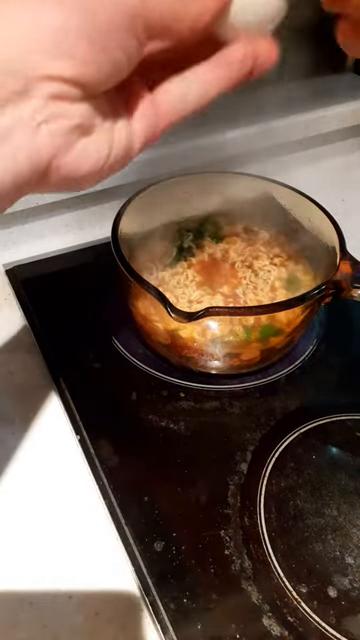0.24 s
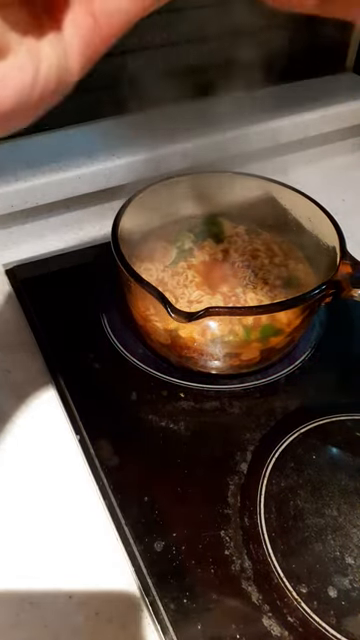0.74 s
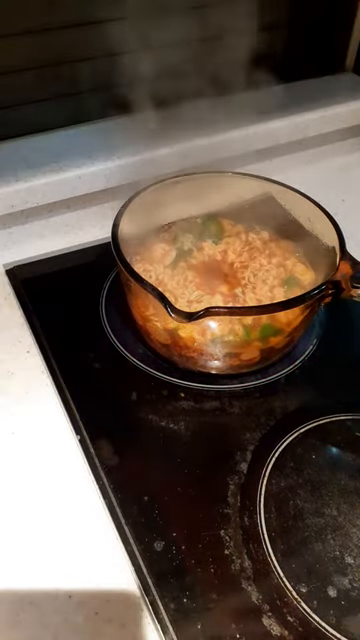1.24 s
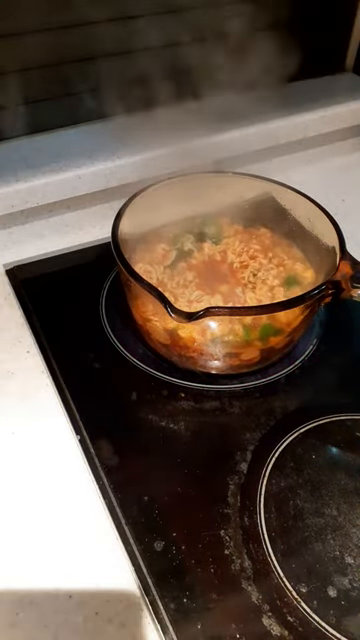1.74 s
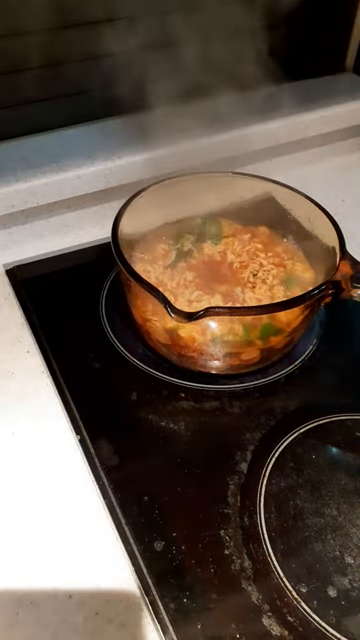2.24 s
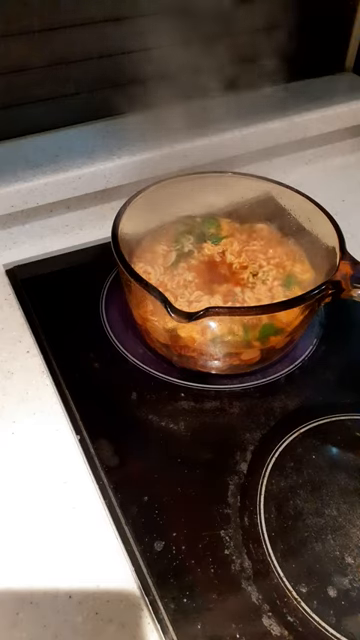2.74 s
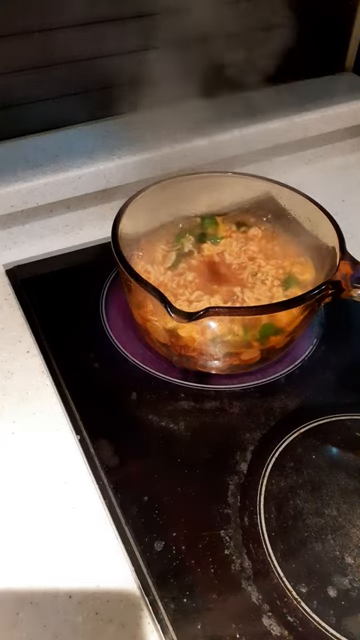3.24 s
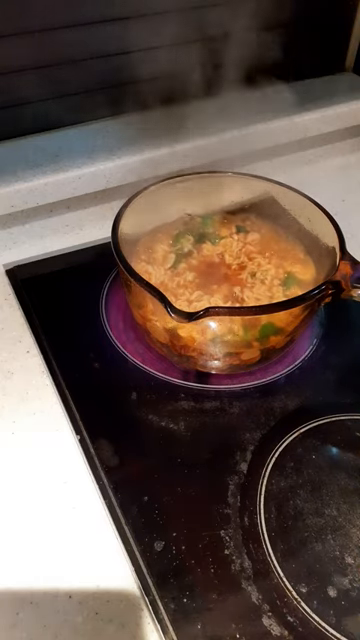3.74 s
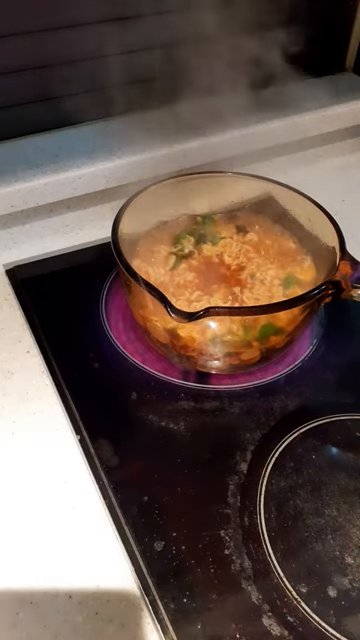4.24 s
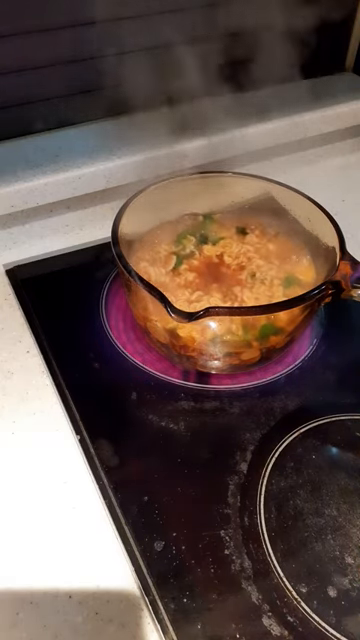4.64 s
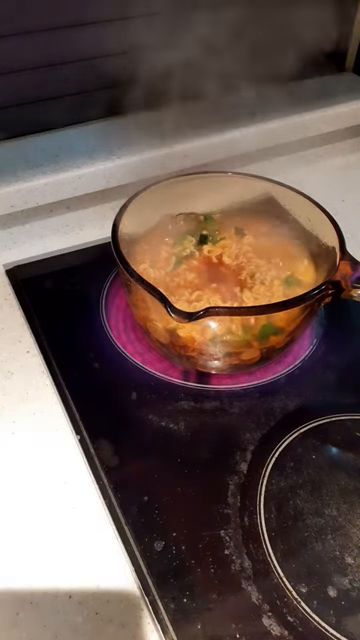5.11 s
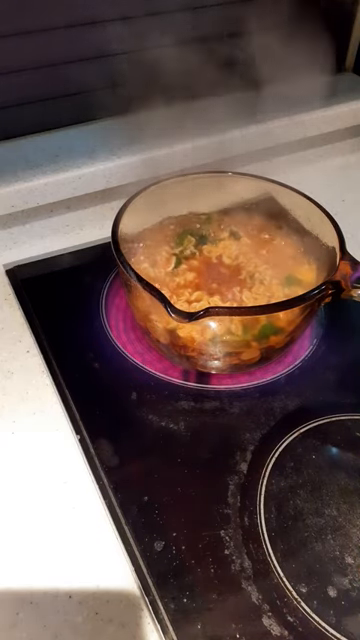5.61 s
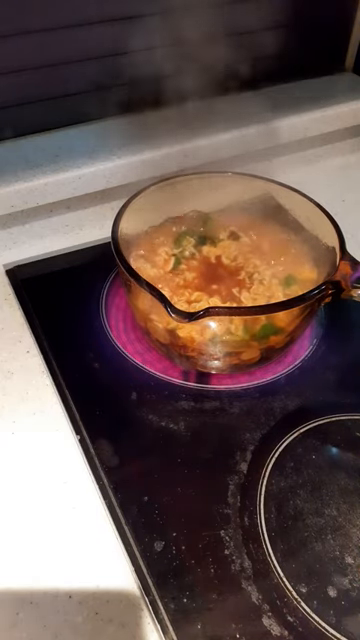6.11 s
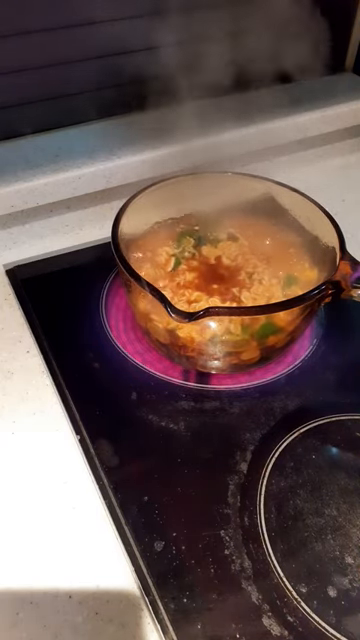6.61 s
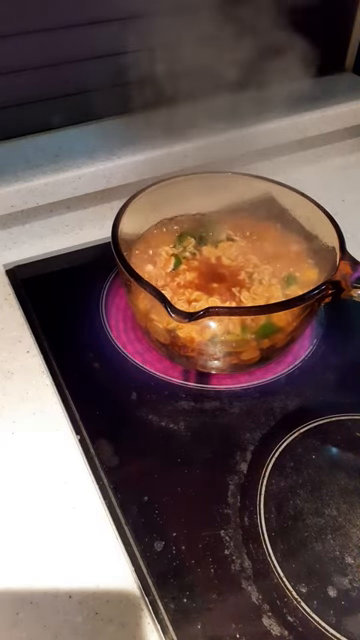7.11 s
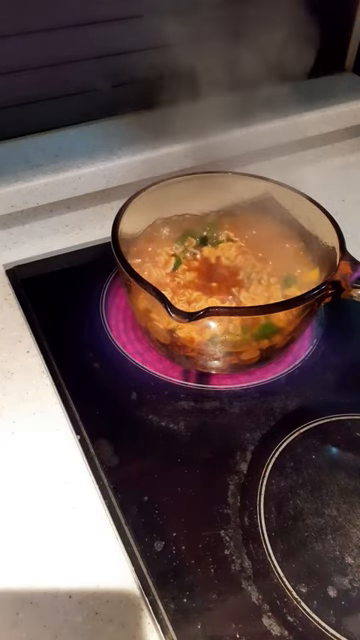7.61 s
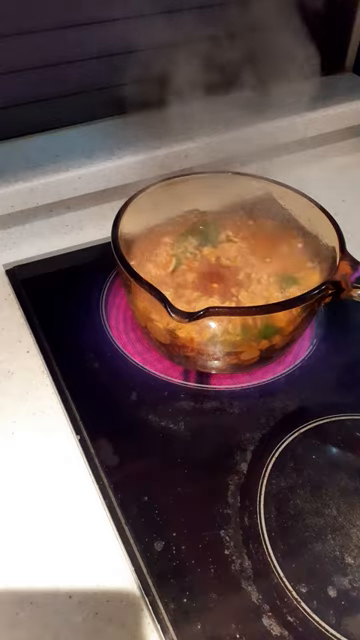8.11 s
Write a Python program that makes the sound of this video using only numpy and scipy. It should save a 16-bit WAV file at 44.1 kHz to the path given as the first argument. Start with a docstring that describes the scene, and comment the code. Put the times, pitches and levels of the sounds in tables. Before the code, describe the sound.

In a small home kitchen, hands work a thin plastic wrapper near a gently bubbling glass saucepan. Dry snaps and ticks come first, thinning out, then a loud hissing crumple with scrapes and knocks on the worktop fills the middle. Afterwards only scattered crackles remain over soft fizz and low hum. Close stereo microphones, open and bright on the left, thinner and hollow, cup-like on the right.

```python
"""Hands tear, crumple and shake a plastic seasoning wrapper: noise bursts, sharp pulses and crackle.
Beside it a glass saucepan simmers: soft low fizz, which also holds the low part of the crumpling,
and rising bubble chirps. Short tones near 800 Hz are held inside grainy bursts of noise.
The worktop rumbles and rings when knocked, and the kitchen hums as two wavering tones.
Two microphone ports listen: the left in the open, the right through the air column of a cup."""
import sys
import numpy as np
from scipy import signal
from scipy.fft import rfft, irfft, next_fast_len
from scipy.io import wavfile
from scipy.ndimage import uniform_filter1d

SR = 44100
rng = np.random.default_rng(int(sys.argv[2]) if len(sys.argv) > 2 else 0)


def output_pcm(signal):
    """Save a mono or channel-first signal as 16-bit PCM at the path in sys.argv[1].

    Samples are clipped to [-1, 1] before scaling.
    """
    pcm = np.clip(np.atleast_2d(signal).T, -1, 1) * 32767
    wavfile.write(sys.argv[1], SR, np.round(pcm).astype(np.int16))


N = 368676  # samples in the scene


def gain_of(db):
    """Turns decibels into a loudness factor."""
    return 10 ** (np.asarray(db) / 20)


def evened(x):
    """Scales a sound to an average (rms) size of 1."""
    return x / np.sqrt(np.mean(x ** 2) + 1e-20)


def read(points, hz):
    """Reads a table between its points, with pitch on a log scale."""
    f, value = np.transpose(points)
    return np.interp(np.log(hz + 1), np.log(f + 1), value)


def curve(rows, column=1):
    """Draws straight lines between the rows of a table, one value per sample."""
    rows = np.array(rows)
    return np.interp(np.arange(N) / SR, rows[:, 0], rows[:, column])


def coloured(x, points):
    """Makes each pitch louder or softer, as a table of levels says."""
    size = next_fast_len(x.shape[-1])
    level_db = read(points, np.fft.rfftfreq(size, 1 / SR))
    return irfft(rfft(x, size) * gain_of(level_db), size)[..., :x.shape[-1]]


def add(mix, s, sound):
    """Mixes a sound in, starting at s seconds."""
    part = mix[round(s * SR):][:len(sound)]
    part += sound[:len(part)]


def ring(x, hz, width):
    """Rings at one pitch like a small resonator; its peak gain is about 1."""
    r = np.exp(-np.pi * width / SR)
    feed = (1 - r * r) / 2
    return signal.lfilter([feed, 0, -feed], [1, -2 * r * np.cos(2 * np.pi * hz / SR), r * r], x)


def grains(per_s, spread_db):
    """Scatters clicks of random sign; a few are large."""
    size = gain_of(spread_db * np.minimum(rng.exponential(1, N), 5))
    return size * rng.choice([-1., 1.], N) * (rng.random(N) < per_s / SR)


def patchy(x, depth_db):
    """Lets patches of time and pitch swell and fade at random."""
    z = signal.stft(x, nperseg=256)[2]
    field = uniform_filter1d(rng.standard_normal(z.shape), size=14, axis=0)
    field = uniform_filter1d(field, size=6, axis=-1)
    patched = z * gain_of(depth_db * evened(field))
    return evened(signal.istft(patched, nperseg=256)[1][:N])


# Handling of the wrapper: (t/s, rustle level/dB, change of the part below about 2.5 kHz level/dB)
HANDLING = [(0, -56, 12), (.5, -58.5, -2), (1.3, -54.5, 6.5), (1.7, -54, 7.5), (2.05, -60, -5),
            (2.9, -61.5, -2), (3.71, -58, 4), (3.77, -37, 7), (3.95, -34.5, -8), (4.18, -33, -0.5),
            (4.275, -31.5, -4), (4.33, -28.5, 1), (4.47, -33.5, -5), (4.72, -30, 1), (4.79, -35, -3.5),
            (5.05, -30, -4.5), (5.61, -30, 6.5), (5.76, -48.5, 7.5), (6.05, -46, 5.5), (6.22, -54.5, 11),
            (6.6, -58.5, 10.5), (7.14, -51.5, 4.5), (7.84, -59.5, -18), (8.03, -59.5, -25),
            (8.36, -63, -14)]
# Quick flaps of the loose film: (t/s at the peak, level/dB)
FLAPS = [(1.65, -50.5), (3.862, -30), (4.054, -29.5), (4.11, -48), (4.201, -28.5), (4.429, -33.5),
         (5.15, -23), (5.73, -39), (5.84, -55), (6.039, -44), (6.126, -44.5)]
FLAP_RISE_S, FLAP_FADE_DB_PER_S = 0.025, 328


def handling_db():
    """Adds the power of the flaps, each a quick rise and a steady fade, to the slow rustle level."""
    t, power = np.arange(N) / SR, gain_of(2 * curve(HANDLING))
    for s, db in FLAPS:
        rise = np.clip(1 + (t - s) / FLAP_RISE_S, 0, 1)
        fade_db = FLAP_FADE_DB_PER_S * np.maximum(t - s, 0)
        power = power + (rise * gain_of(db - fade_db)) ** 2
    return 10 * np.log10(power)


# Tone of the film, before levelling: (f/Hz, level/dB per Hz)
FILM = [(150, -62), (400, -5), (900, -2.5), (1500, -1), (3000, -1), (7500, -1), (11000, -2), (16000, -2)]


def rustle():
    """Film hisses, crackles and rings; a separate curve raises or lowers the part below about 2.5 kHz."""
    burst = signal.oaconvolve(abs(grains(300., 1.4)), np.exp(-np.arange(400) / 95.0))[:N]
    hiss = rng.standard_normal(N) * (1 + 0.55 * evened(abs(burst)))
    level_db = handling_db()
    film = gain_of(level_db) * patchy(coloured(hiss, FILM), 3.2)
    film += gain_of(level_db - 6.0) * evened(coloured(grains(1500., 3.), FILM))  # fine crackle
    t, blips = np.arange(1500) / SR, np.zeros(N)
    for hz in np.geomspace(1000, 6000, num=16):  # small pockets of film ring briefly
        blip = np.sin(2 * np.pi * hz * t) * t * np.exp(-t / 0.0012)
        blips += signal.oaconvolve(grains(40., 2.5), blip)[:N]
    film += gain_of(level_db - 8.) * evened(blips)
    dull = signal.sosfilt(signal.butter(2, 2500, fs=SR, output="sos"), film)
    return film + (gain_of(curve(HANDLING, column=2)) - 1) * dull


# Soft low fizz: the simmer, plus the low part of the crumpling wrapper.
# Before a small lift: (t/s, level/dB)
LOW_FIZZ = [(0, -61.5), (.9, -62.5), (1.58, -55.5), (2.15, -57.5), (2.35, -55.5), (2.55, -58), (3.03, -59),
            (3.7, -58), (4.14, -50), (5.1, -50), (5.75, -52.5), (6.12, -59.5), (7.01, -51), (7.6, -55),
            (8.36, -53)]
# Tone of the fizz, before levelling: (f/Hz, level/dB per Hz)
FIZZ_TONE = [(90, -49), (200, 9.5), (400, 7.5), (800, 2), (1500, 2), (3000, 1.5), (7000, -9.5),
             (16000, -46)]
# Air ringing in the pan: (f/Hz, width f/Hz, level/dB against the fizz)
PAN = [(495, 82, -56), (708, 29, -7.5), (792.5, 30, -11), (1180, 92, -6.5)]


def simmer():
    """Bubbles burst with a rising pitch over low fizz, which rings like the air in the pan."""
    t, bubbles = np.arange(1500) / SR, np.zeros(N)
    for hz in np.geomspace(500, 1800, num=12):
        rising_tone = np.sin(2 * np.pi * hz * (t + 8 * t ** 2))
        bubble = rising_tone * np.exp(-t * hz / 5) * np.minimum(t / 0.001, 1)
        bubbles += signal.oaconvolve(grains(6.0, 4.7), bubble)[:N]
    fizz = patchy(coloured(rng.standard_normal(N), FIZZ_TONE), 1.8)
    pan_air = sum(gain_of(db) * evened(ring(fizz, hz, width)) for hz, width, db in PAN)
    return gain_of(curve(LOW_FIZZ) + 0.5) * (fizz + pan_air + 0.5 * evened(bubbles))


# Rumble through the worktop: (t/s, level/dB)
RUMBLE = [(0, -60.5), (1.8, -58), (2.75, -65), (3.54, -61), (3.7, -49), (4.3, -55.5), (5.4, -54.5),
          (5.66, -48), (5.82, -53), (6.15, -57), (8.36, -56)]
# Tone of the rumble, before levelling: (f/Hz, level/dB per Hz)
WORKTOP = [(20, -43), (35, -40), (55, -4.5), (85, -14), (120, -8.5), (180, -13.5), (260, -8.5), (400, -49),
           (800, -78)]
# Steady part of the kitchen hum: (f/Hz, rms level/dB)
HUM = [(58, -58.5), (120, -68)]


def worktop():
    """Low noise rumbles under tones that waver slightly; both ports get the same sound."""
    t = np.arange(N) / SR
    out = gain_of(curve(RUMBLE)) * evened(coloured(rng.standard_normal(N), WORKTOP))
    for hz, db in HUM:
        steady = np.sqrt(2) * np.sin(2 * np.pi * hz * t)
        waver = evened(ring(rng.standard_normal(N), hz, 0.3))
        out += gain_of(db) * (steady + 0.1 * waver)
    return out


# Snaps of the wrapper, and a few dull low plops (high body), before trim and tilt:
# (t/s, level/dB, body around 1-3 kHz level/dB)
SNAPS = [(.038, -34.5, -3), (0.1226, -28.5, -19), (0.207, -27, -10.5), (0.275, -26, -14),
         (0.3325, -12.5, -14.5), (0.362, -27, -10), (.3845, -21.5, -15), (0.504, -24, -15),
         (0.521, -22.5, -12), (0.546, -20.5, -29), (0.5696, -20, -12), (0.583, -18.5, -47),
         (.636, -23.5, -32), (0.689, -23.5, -9), (0.74, -31, -10), (0.754, -20.5, -13),
         (0.785, -24.5, -11.5), (0.803, -24, -18), (.856, -28, -12), (0.8932, -28.5, -5), (0.94, -19, -16),
         (0.994, -26, -7), (1.0425, -25, -10.5), (1.096, -27, -16), (1.123, -30, -34), (1.186, -13, -16),
         (1.284, -22.5, -11.5), (1.3385, -32, -23), (1.4198, -22.5, -6.5), (1.493, -18, -12),
         (1.6412, -16.5, -18.5), (1.7742, -21, -16), (1.7873, -12.5, -12.5), (1.8571, -28.5, -10),
         (1.875, -25.5, -33), (1.9334, -31.5, -6.5), (1.978, -24, -11.5), (1.997, -25, -10),
         (2.031, -19.5, -12.5), (2.049, -25, -9), (2.152, -30.5, -4), (2.217, -35, 0), (2.254, -33, 2),
         (2.329, -41, 14), (2.427, -16.5, -14), (2.459, -30, -6), (2.59, -51, 19.5), (2.664, -41.5, 7),
         (2.722, -32.5, 0.5), (2.824, -20, -12), (2.937, -41, -18), (3.0663, -18, -15), (3.14, -29, -13),
         (3.1565, -19.5, -10.5), (3.176, -20.5, -27), (3.2988, -16, -15), (3.3533, -30, -2),
         (3.493, -36, 2.5), (3.524, -32.5, -8), (3.6077, -16.5, -15.5), (3.736, -38, 9),
         (3.763, -15.5, -25), (4.196, -19.5, -6), (4.3858, -14, -29), (4.639, -14.5, -34),
         (4.715, -14.5, -16.5), (4.916, -15, -40), (5.158, -22, 3), (5.415, -16, -17), (5.813, -39, -18),
         (5.831, -16.5, -14), (6.0295, -14.5, -29), (6.052, -18.5, -32), (6.092, -34.5, 2),
         (6.115, -18, -20), (6.127, -13.5, -20), (6.146, -20, -28), (6.234, -21.5, -28), (6.3967, -28, 0),
         (6.609, -25.5, -9), (6.772, -32, -8), (6.805, -37, 13.5), (6.827, -25.5, -3), (6.889, -27.5, -15),
         (6.9198, -29, -10), (6.946, -31, -30), (6.984, -30, -26), (7.02, -26, -3), (7.0421, -10, -18.5),
         (7.094, -23, -17), (7.292, -16.5, -16.5), (7.317, -20.5, -12), (7.348, -23, -9),
         (7.458, -45, 19.5), (7.529, -27, -40), (7.5934, -28, -14), (7.612, -40.5, 15), (7.639, -24.5, -20),
         (7.694, -28.5, -4), (7.715, -25, -23), (7.7432, -25, -9.5), (7.761, -24, -7), (7.812, -27, -29),
         (7.8392, -23, -16), (7.914, -33.5, 6.5), (8.18, -46, 17)]
SNAP_T60_S = 0.027  # time to fade by 60 dB


def snaps():
    """Noise swells as a crease gives way, then rattles unevenly and fades; a high body makes a dull plop."""
    out, t = np.zeros(N), np.arange(4096) / SR
    lead = 64  # samples of room for the filter to spread ahead of the snap
    for (s, db, body_db), noise in zip(SNAPS, rng.standard_normal((len(SNAPS), 2, 4096))):
        rise = .0028 * gain_of(.8 * (db + 12))  # a louder one takes longer to swell
        swell = np.minimum(0.29 + t / rise, 1)
        shake = swell * gain_of(-60 * np.maximum(t - rise, 0) / SNAP_T60_S)
        lumps = gain_of(4. * evened(uniform_filter1d(noise[1], size=16)))
        rattle = np.roll(noise[0] * shake * lumps, lead)
        tilt = [(120, body_db + 8.5), (500, body_db + 10.5), (1500, body_db + 13.5),
                (4500, 0.006), (16000, 0.01)]
        add(out, s - lead / SR, gain_of(db - 9.0) * coloured(rattle, tilt))
    return out


# Sharp spikes of the film, many of them at the onset of a snap.
# Before the final tone and lift: (t/s, level/dB)
SPIKES = [(0.0393, -29), (0.1234, -21), (0.2098, -21), (0.2798, -18), (0.3337, -8), (0.3454, -16),
          (0.3844, -22), (0.4106, -20), (0.5714, -18), (0.6811, -24), (0.6895, -17), (0.7429, -22),
          (0.7864, -20), (0.8046, -21), (1.0428, -21), (1.1242, -19), (1.1717, -30), (1.2843, -20),
          (1.4212, -18), (1.4813, -30), (1.508, -17), (1.5843, -32), (1.5896, -27), (1.616, -29),
          (1.6272, -24), (1.6428, -12), (1.6879, -24), (1.7892, -11), (1.8591, -22), (2.0518, -18),
          (2.0951, -27), (2.1387, -32), (2.1547, -27), (2.2428, -32), (2.2768, -29), (2.7555, -29),
          (3.0689, -17), (3.1412, -22), (3.1584, -11), (3.4971, -23), (3.5255, -25), (3.5869, -33),
          (3.7398, -22), (5.8328, -11), (6.0173, -17), (6.234, -15), (6.2439, -18), (6.3757, -29),
          (6.3971, -19), (6.6117, -15), (6.6512, -29), (6.7723, -19), (6.8683, -28), (6.9214, -21),
          (6.9479, -18), (6.9846, -19), (7.0949, -17), (7.1204, -26), (7.1372, -25), (7.1588, -26),
          (7.1838, -28), (7.1947, -29), (7.2947, -14), (7.3161, -17), (7.3388, -18), (7.3854, -27),
          (7.4396, -27), (7.4867, -22), (7.5294, -25), (7.5648, -25), (7.5944, -20), (7.6409, -21),
          (7.6756, -26), (7.6952, -20), (7.7163, -17), (7.7439, -21), (7.7636, -20), (7.8129, -20),
          (7.841, -15), (7.9036, -31)]
# Echo off the worktop: (delay/samples, share of the spike)
BOUNCE = (68, .45)


def cracks():
    """Each listed crack is one inward pulse that flutters and bounces; dense crackle goes either way."""
    train, t = np.zeros(N), np.arange(200) / SR
    for s, db in SPIKES:
        add(train, s, gain_of([db]))
    level_db = handling_db()
    # lesser inward cracks at random
    train += gain_of(np.minimum(level_db, -50.) + 18.) * abs(grains(60., 3.))
    train += gain_of(level_db + 7.) * grains(700., 3.)  # dense crackle under the grip
    delay, share = BOUNCE
    train += share * np.roll(train, delay)
    pulse = -np.cos(2 * np.pi * 6500 * t) * np.exp(-t / .0001)
    cracking = signal.oaconvolve(train, pulse)[:N]
    return gain_of(2.5) * coloured(cracking, [(300, -20), (1500, -6.), (4000, 0)])


# Short scrapes of film on film, before trim; lengths under 5 ms are raised to it:
# (t/s, level/dB, centre f/Hz, length t/s, lower pocket against the centre level/dB)
SCRAPES = [(0.36, -17, 2870, 0.01, 5), (0.384, -28.5, 2830, 0.098, 6), (0.421, -45, 2950, 0.1, 13),
           (0.522, -38, 2760, 0.067, 11), (0.579, -16, 2720, 0.036, -1), (0.581, -15.5, 4460, 0.022, -11),
           (0.604, -30.5, 2600, 0.033, 6), (3.929, -9, 1320, 0.0045, -3.5), (4.19, -16.5, 3800, 0.019, -17),
           (4.309, -25, 920, 0.074, -22), (4.108, -11.5, 4430, 0.014, -15),
           (4.502, -15.5, 2360, 0.028, -21), (4.592, -19.5, 3070, 0.027, -16),
           (4.611, -16, 3330, 0.029, -21), (4.707, -8.5, 1910, 0.016, -21), (4.72, -17, 2800, .012, -20),
           (4.813, -17.5, 3800, 0.039, -19), (4.915, -16, 4500, .015, -20), (5.003, -17.5, 3170, 0.031, -3),
           (5.025, -16, 2630, 0.031, 2), (5.039, -7, 1245, 0.03, -30), (5.203, -15, 1230, 0.056, -11),
           (5.137, -14, 820, 0.026, -10), (5.304, -15.5, 1390, 0.055, -32),
           (5.505, -17.5, 835, 0.061, -4.5), (5.728, -8, 4690, 0.015, -13),
           (5.882, -22.5, 1530, 0.041, -24), (5.903, -28, 2920, 0.027, -20), (6.105, -25.5, 2650, 0.014, 5),
           (6.178, -24.5, 4030, 0.016, -21), (6.788, -16.5, 3480, 0.02, -5.5),
           (6.793, -25, 2270, 0.042, -5), (7.078, -24, 2870, 0.022, -7), (7.217, -18.5, 3130, 0.022, -10),
           (7.331, -21.5, 3530, 0.02, -15), (7.346, -20.5, 3740, 0.02, -16)]
POCKET_WIDTH = .14  # as a share of the pitch


def scrapes():
    """Film rubs on film: grainy puffs of noise ring two pockets of it."""
    out = np.zeros(N)
    for (s, db, hz, length, low_db), noise in zip(SCRAPES, rng.standard_normal((len(SCRAPES), 8192))):
        u = np.arange(8192) / SR / max(length, .005)  # time in scrape lengths
        grit = noise * abs(noise)
        width = POCKET_WIDTH * hz
        high = evened(ring(ring(grit, hz, width), hz, 2 * width))
        low = evened(ring(grit, 0.65 * hz, 0.22 * hz))
        puff = np.minimum(u / 0.15, 1) * np.exp(-2.2 * u ** 2)
        add(out, s, gain_of(db - 11.0) * (high + gain_of(low_db) * low) * puff)
    return out


# Short held tones near 800 Hz: (start t/s, length t/s, rms level/dB of the tone)
HELD_TONES = [(1.155, 0.044, -52), (1.238, 0.024, -40.5), (1.36, 0.038, -52), (2.25, 0.033, -58),
              (2.327, 0.087, -48), (2.44, 0.06, -53), (3.3, 0.077, -63), (3.77, 0.058, -41.5),
              (4.29, 0.096, -41.5), (5.8, 0.039, -68), (6.79, 0.039, -46), (6.96, 0.14, -53),
              (7.108, 0.066, -55), (7.439, 0.031, -47.5), (7.525, 0.031, -53), (7.623, 0.072, -48.5),
              (7.68, 0.089, -50), (7.912, 0.05, -53), (8.014, 0.044, -53)]
HELD_HZ = 789  # middle of the wavering pitch


def held_tones():
    """Short tones near 800 Hz waver in pitch, each inside a grainy burst of noise."""
    out, t = np.zeros(N), np.arange(8192) / SR
    for (s, length, db), noise in zip(HELD_TONES, rng.standard_normal((len(HELD_TONES), 2, 8192))):
        hz = HELD_HZ * (1 + .03 * evened(uniform_filter1d(noise[0], size=600)))
        tone = np.sqrt(2) * np.sin(2 * np.pi * np.cumsum(hz) / SR)
        grainy = 1.2 * evened(ring(noise[1] * abs(noise[1]), 920, 700))
        hold = np.clip(np.minimum(t / 0.0026, (length - t) / 0.008 + 1), 0, 1)
        add(out, s, gain_of(db) * (tone + grainy) * hold)
    return out


# Knocks on the worktop; a harder contact sits higher: (t/s, level/dB, centre of the blow f/Hz)
KNOCKS = [(1.738, -53, 53.6), (2.258, -50, 55), (2.329, -54, 700), (2.769, -42.5, 54), (3.61, -37, 129),
          (4.63, -21, 590), (4.645, -40, 780), (5.489, -32, 125), (5.542, -34, 292), (5.612, -18.5, 516),
          (5.576, -30, 250), (5.625, -27, 122), (5.642, -43, 282), (5.629, -27.5, 54), (5.688, -38, 263),
          (5.75, -37, 815)]
# Pitches at which the board rings: (f/Hz, time to fade by 60 dB t/s)
BOARD = [(54, 0.39), (125, 0.078), (292, 0.24), (585, 0.078), (780, 0.2)]
REACH_DB_PER_OCTAVE = 28  # pitches away from the centre of a blow ring less


def knocks():
    """Dull blows make the board ring, with a short puff of noise around the centre of the blow."""
    out, t = np.zeros(N), np.arange(SR // 2) / SR
    for (s, db, hz), noise in zip(KNOCKS, rng.standard_normal((len(KNOCKS), SR // 2))):
        board = np.zeros(len(t))
        for f, t60 in BOARD:
            loss_db = REACH_DB_PER_OCTAVE * abs(np.log2(f / hz)) + 60 * t / t60
            board += gain_of(-loss_db) * np.sin(2 * np.pi * f * t)
        # the puff fades twice as fast as the board
        puff = evened(ring(noise, hz, 0.24 * hz)) * gain_of(-120 * t / read(BOARD, hz))
        onset = np.minimum(t * hz, 1)  # a low blow lands softly
        add(out, s, gain_of(db) * (board + 1.42 * puff) * onset)
    return out


# Echoes of the kitchen: (f/Hz, time to fade by 60 dB t/s)
KITCHEN = [(200, 0.19), (1500, 0.12), (5000, 0.12), (15000, 0.073)]
LAG = 13  # samples by which the right port hears later, give or take 3


def kitchen(x, wet_db, count=8):
    """Direct sound plus sparse echoes, treble dying first; the path cycles as the source moves about."""
    turn = np.arange(N) / (.025 * SR) % count  # a new path every 25 ms
    out = np.array([x, 0 * x])
    slots = np.arange(60, SR // 3 - 20, 20)
    for k in range(count):
        taps = np.zeros((2, SR // 3))
        at = slots + rng.integers(0, 20, (2, len(slots)))
        np.put_along_axis(taps, at, rng.choice([-1., 1.], at.shape), 1)
        hz, t, z = signal.stft(taps, SR, nperseg=128)
        fade = gain_of(-60 * t / read(KITCHEN, hz)[:, None])
        tail = signal.istft(z * fade, SR, nperseg=128)[1]
        tail = coloured(tail, [(120, -5.5), (700, 9.0)])  # less bass in the echoes, which differ by port
        tail *= gain_of(wet_db) / np.linalg.norm(tail[0])
        away = abs((turn - k + count / 2) % count - count / 2)
        share = np.cos(np.pi / 2 * np.minimum(away, 1))  # squares of neighbours sum to 1
        out[1] += np.roll(x * share ** 2, LAG + rng.integers(-3, 4))
        out += signal.fftconvolve((x * share)[None], tail, axes=1)[:, :N]
    return out


def scene():
    """Cracks, held tones, scrapes fairly dry; snaps, knocks, rustle, simmer echo more; worktop has no echo."""
    out = kitchen(snaps() + knocks(), -0.27)
    out += kitchen(cracks() + held_tones() + scrapes(), -7.5)
    return out + kitchen(rustle() + simmer(), 0.62) + worktop()


# Air column of the cup: (peak f/Hz, width f/Hz, following dip f/Hz, width f/Hz)
CUP = [(247, 17, 440, 170), (804, 27, 990, 130), (1400, 42, 1600, 260)]
# Tone of the left channel, with a steep band limit near 16 kHz: (f/Hz, level/dB)
LEFT_TONE = [(25, -9), (50, -1), (250, 0.5), (500, -5), (2000, -5), (7600, -2), (9200, -4), (12000, 3),
             (15600, 2.5), (16100, -46)]
# Tone of the right channel, with a steep band limit near 16 kHz: (f/Hz, level/dB)
RIGHT_TONE = [(25, -36), (50, -24.5), (150, -23), (600, -18), (1200, -22.5), (2300, -4), (7600, -7),
              (8400, -16.5), (15600, -3.5), (16100, -47)]
EDGE_HZ = 16990  # edge of the final low-pass


def record(dry):
    """Each standing wave in the cup gives the right port a peak, then a dip; a low-pass ends both."""
    size = next_fast_len(N + SR)
    f = np.fft.rfftfreq(size, 1 / SR)
    column = np.ones(len(f), dtype=complex)
    for hz, width, dip, wide in CUP:
        column *= (dip ** 2 - f ** 2 + 1j * f * wide) / (hz ** 2 - f ** 2 + 1j * f * width)
    in_cup = irfft(rfft(dry[1], size) * column, size)[:N]
    ports = np.array([coloured(dry[0], LEFT_TONE), coloured(in_cup, RIGHT_TONE)])
    low_pass = signal.firwin(511, EDGE_HZ, window=("kaiser", 9), fs=SR)
    return signal.oaconvolve(ports, low_pass[None], "same")


dry = scene()
out = record(dry)
output_pcm(out)
```